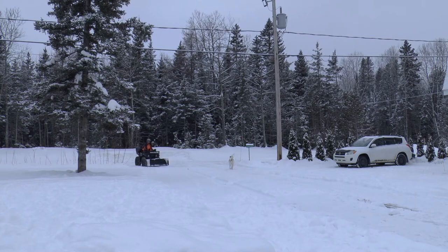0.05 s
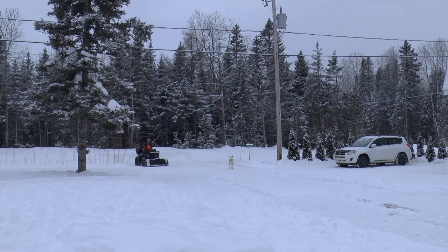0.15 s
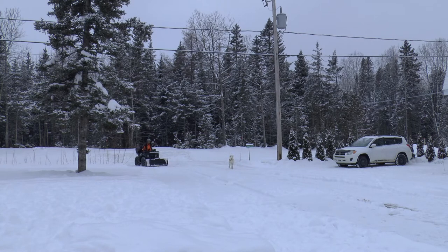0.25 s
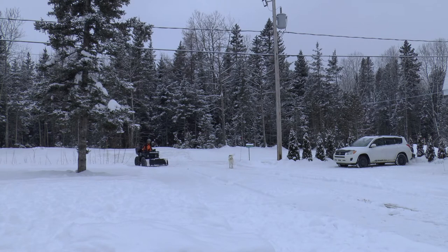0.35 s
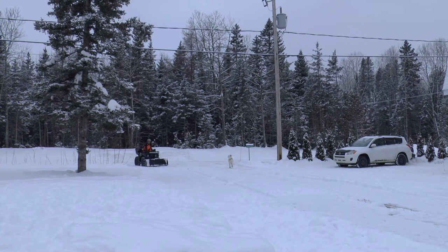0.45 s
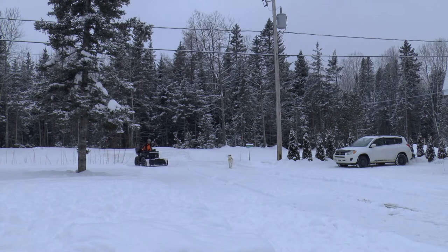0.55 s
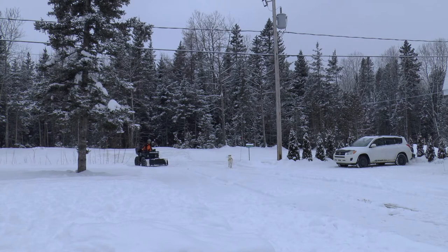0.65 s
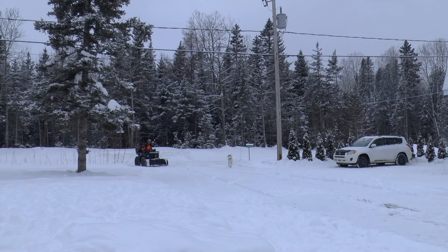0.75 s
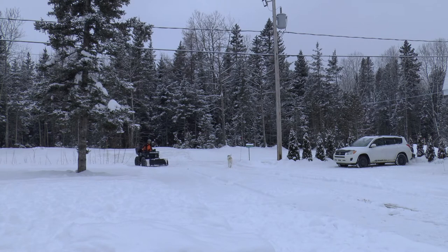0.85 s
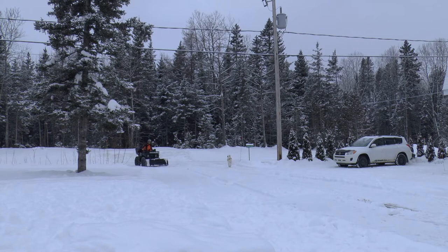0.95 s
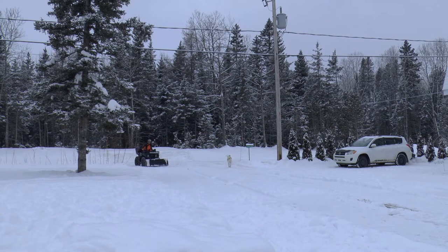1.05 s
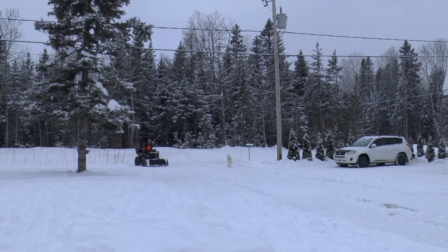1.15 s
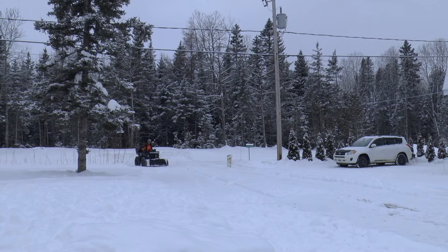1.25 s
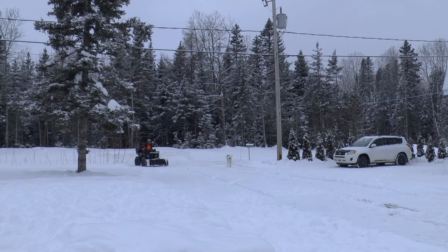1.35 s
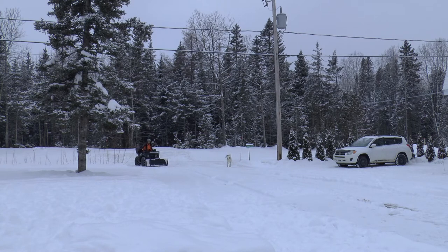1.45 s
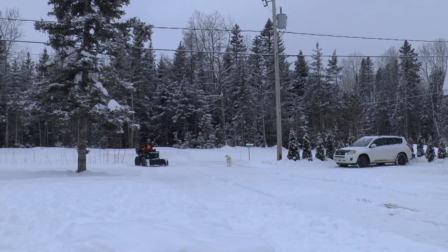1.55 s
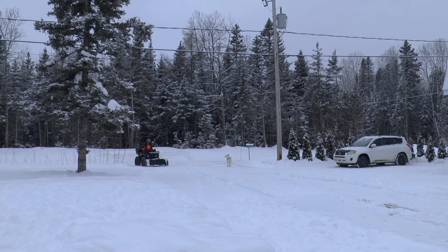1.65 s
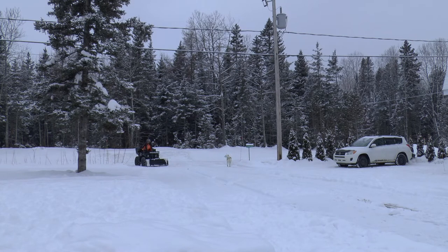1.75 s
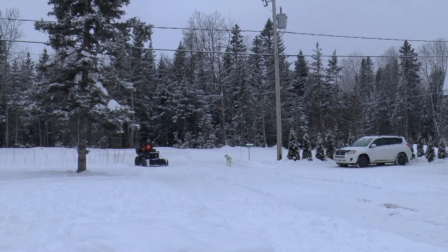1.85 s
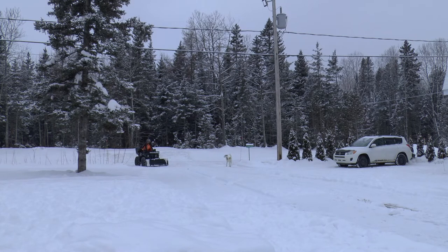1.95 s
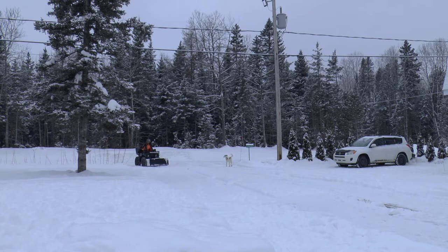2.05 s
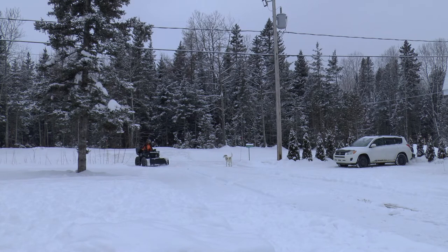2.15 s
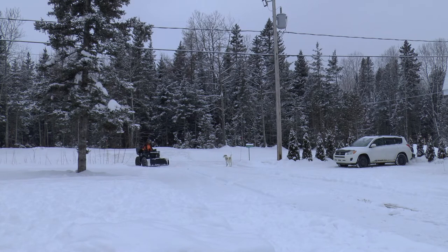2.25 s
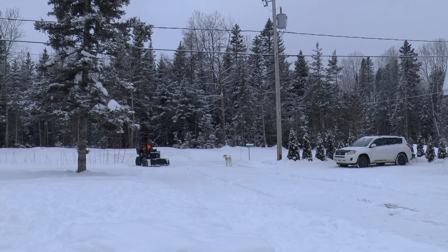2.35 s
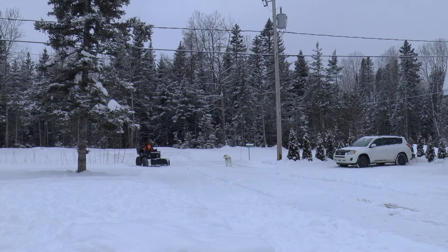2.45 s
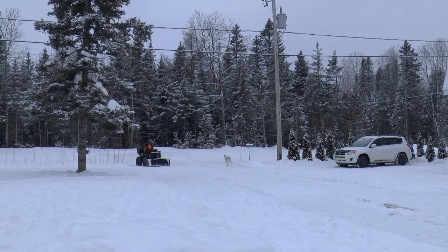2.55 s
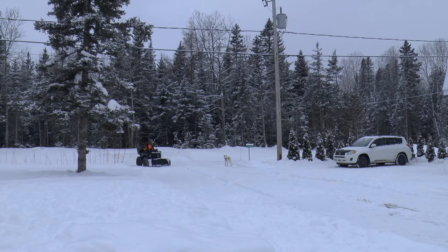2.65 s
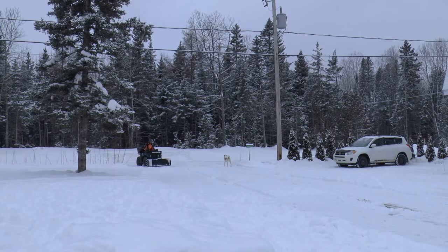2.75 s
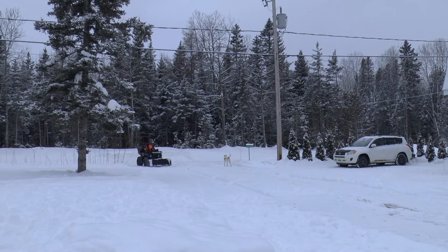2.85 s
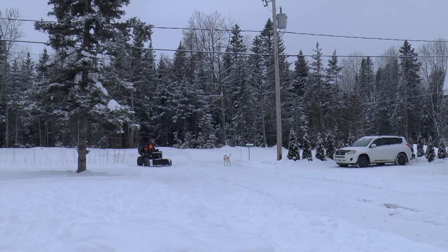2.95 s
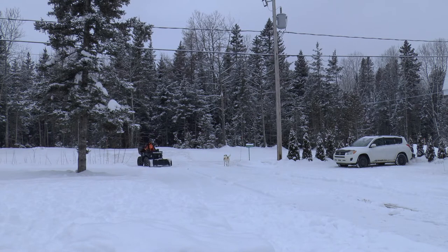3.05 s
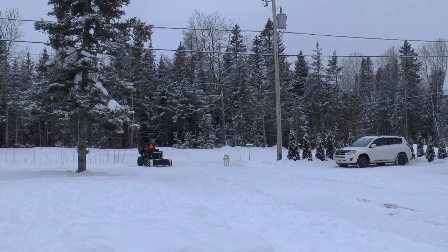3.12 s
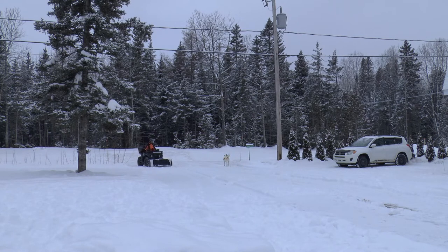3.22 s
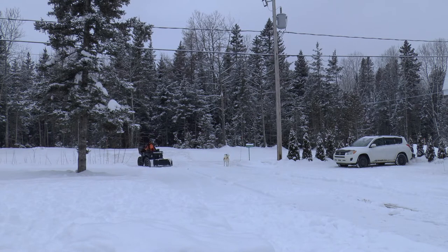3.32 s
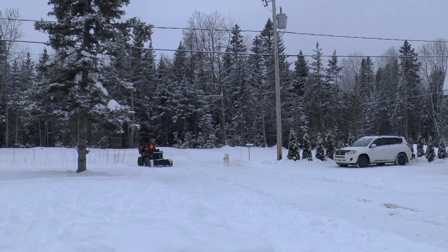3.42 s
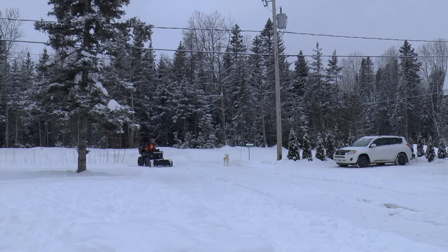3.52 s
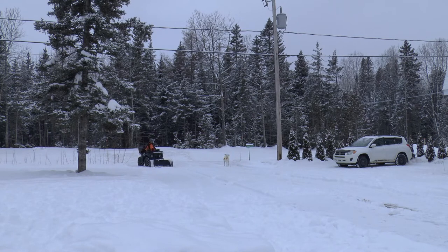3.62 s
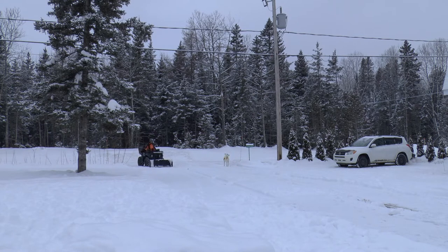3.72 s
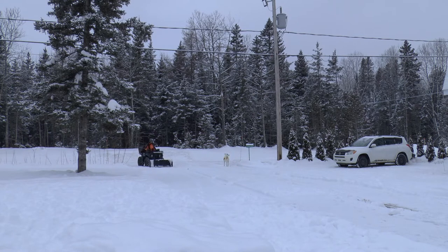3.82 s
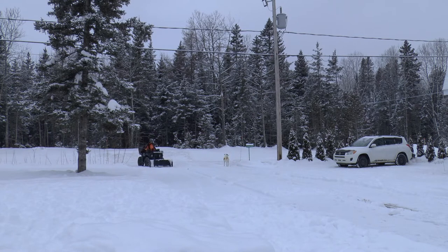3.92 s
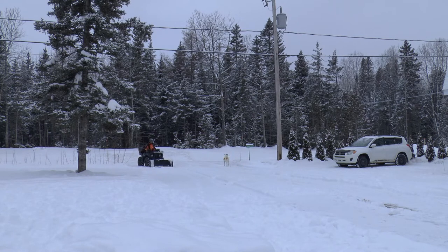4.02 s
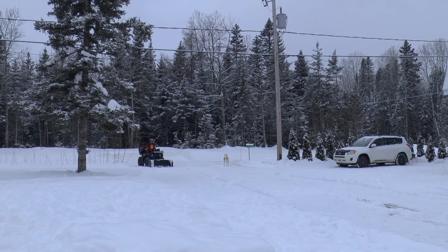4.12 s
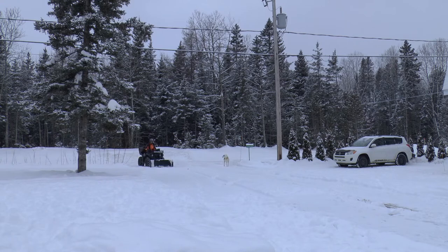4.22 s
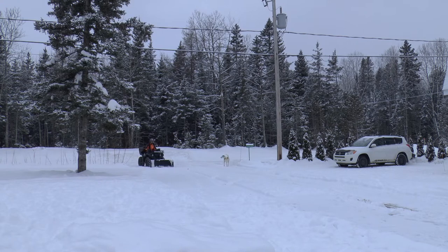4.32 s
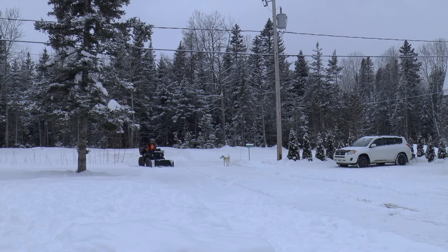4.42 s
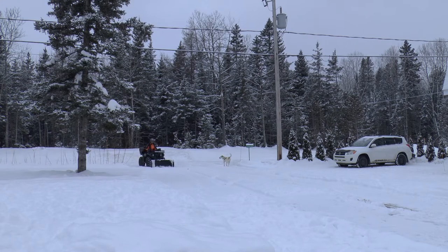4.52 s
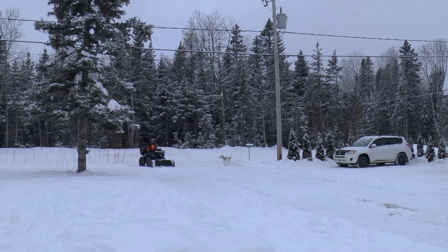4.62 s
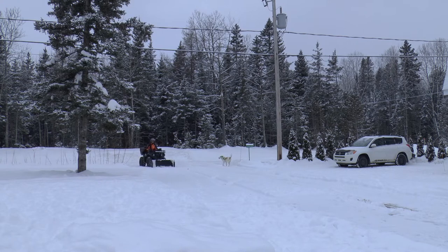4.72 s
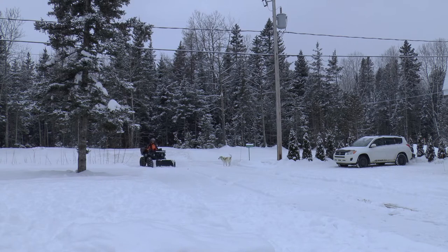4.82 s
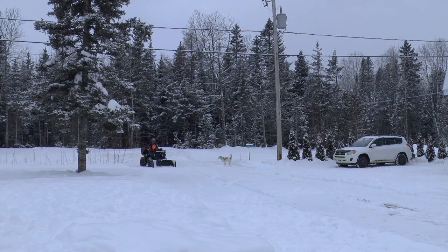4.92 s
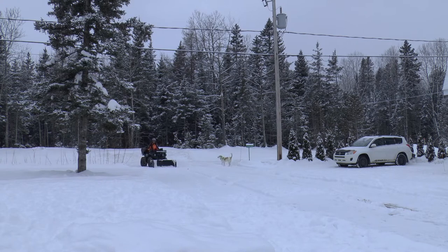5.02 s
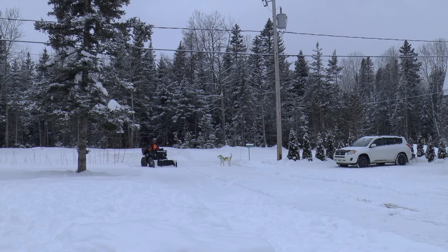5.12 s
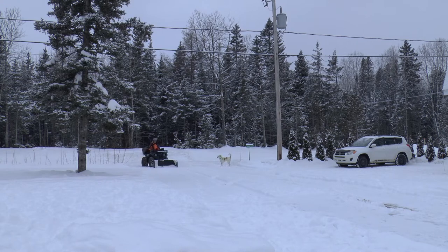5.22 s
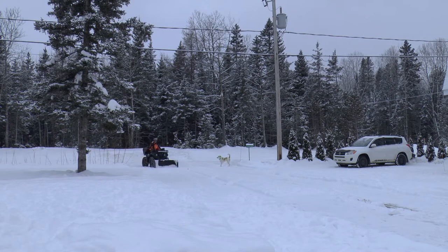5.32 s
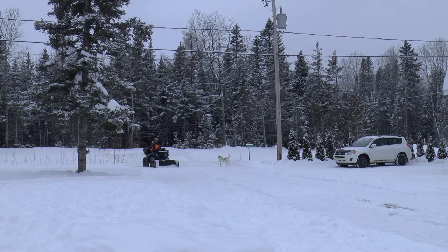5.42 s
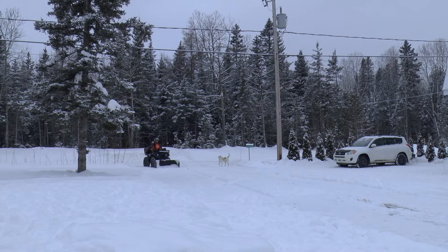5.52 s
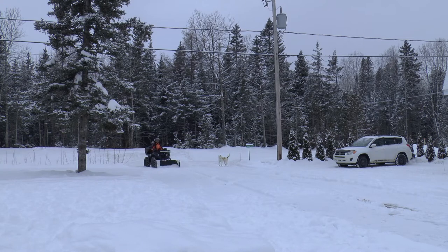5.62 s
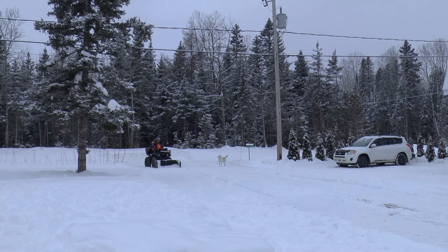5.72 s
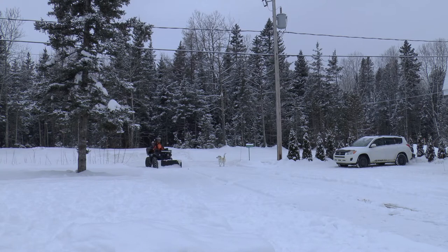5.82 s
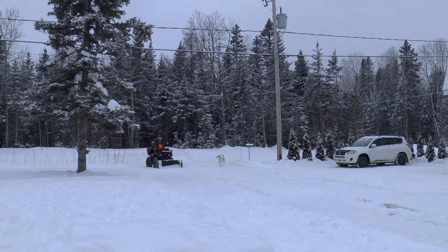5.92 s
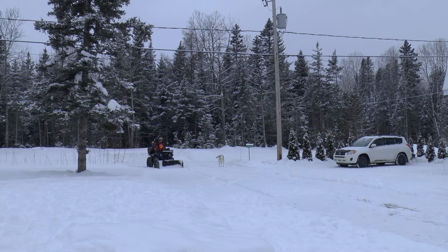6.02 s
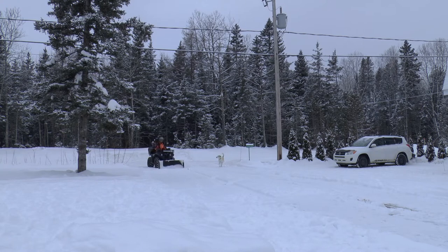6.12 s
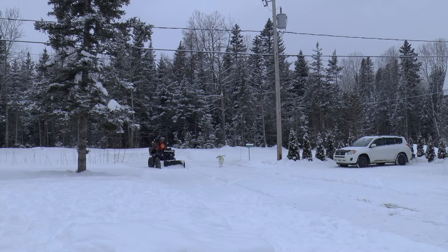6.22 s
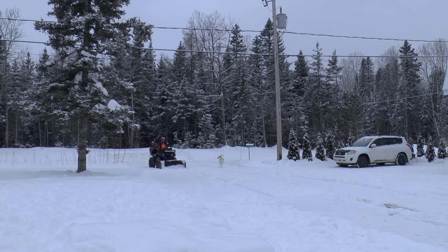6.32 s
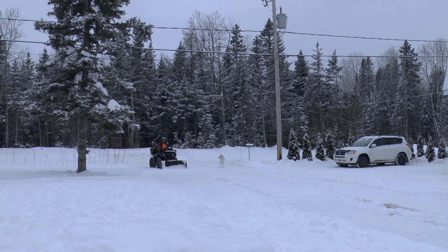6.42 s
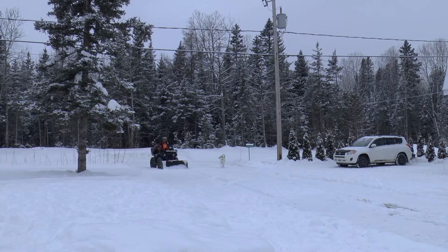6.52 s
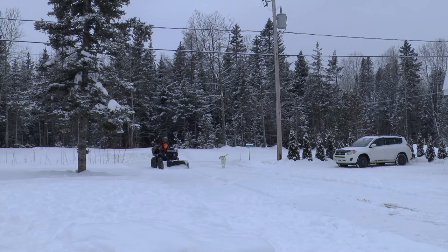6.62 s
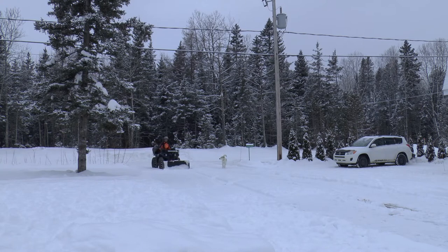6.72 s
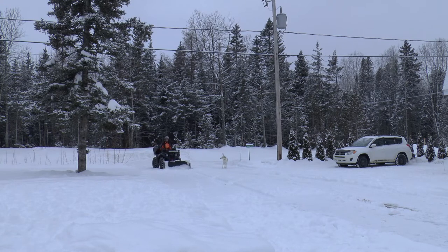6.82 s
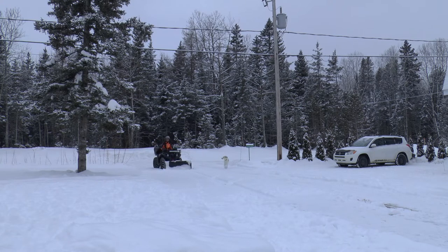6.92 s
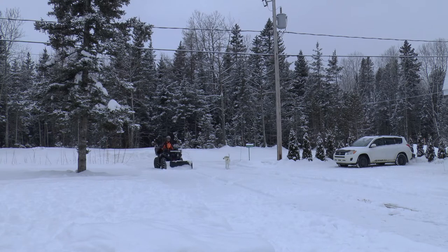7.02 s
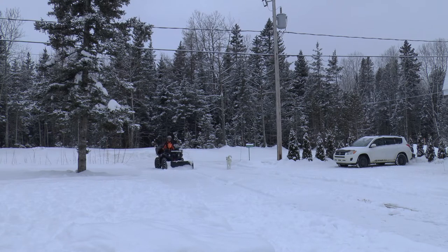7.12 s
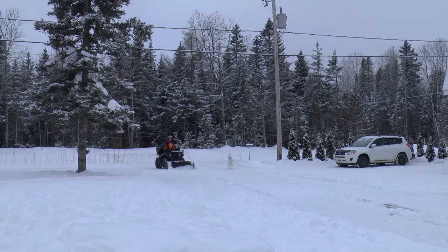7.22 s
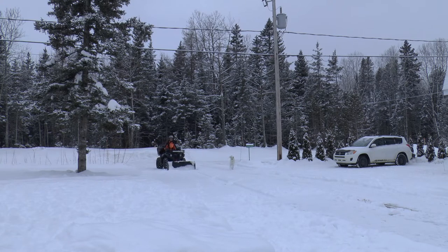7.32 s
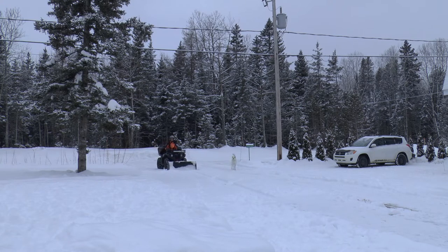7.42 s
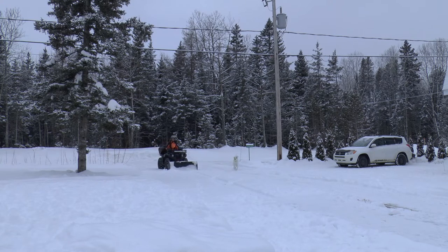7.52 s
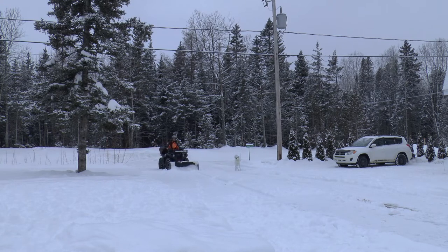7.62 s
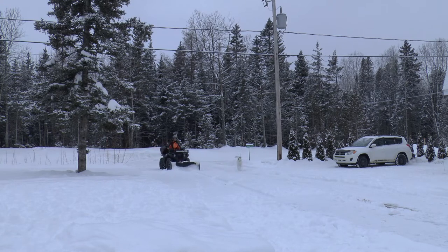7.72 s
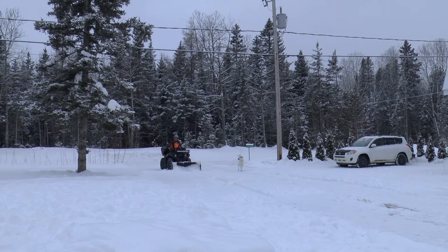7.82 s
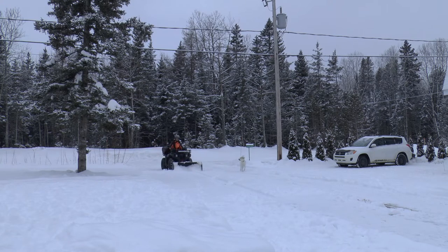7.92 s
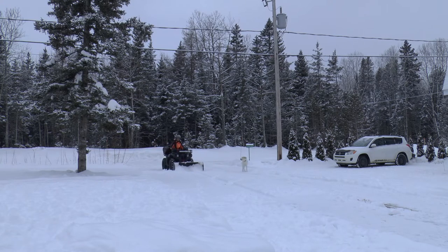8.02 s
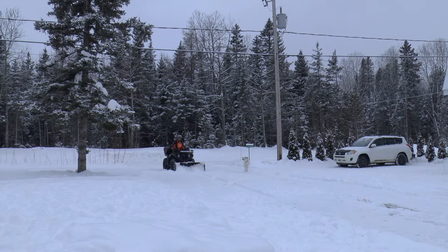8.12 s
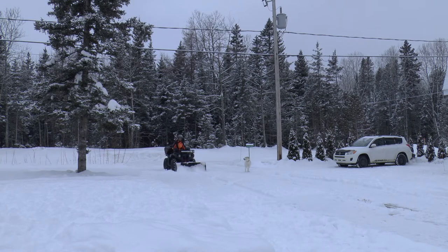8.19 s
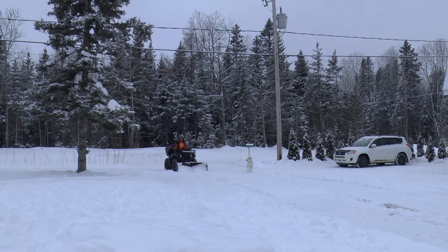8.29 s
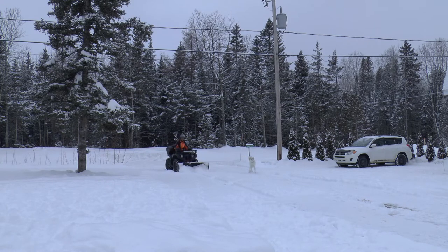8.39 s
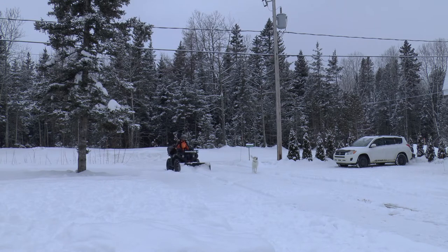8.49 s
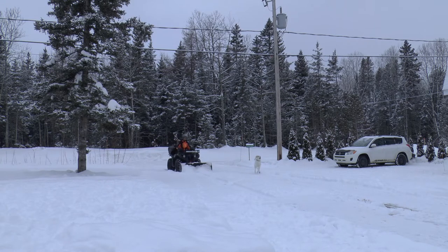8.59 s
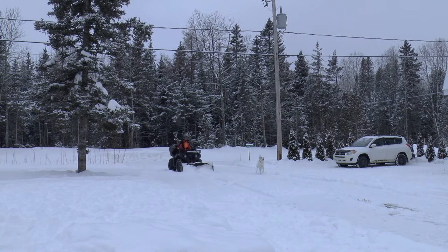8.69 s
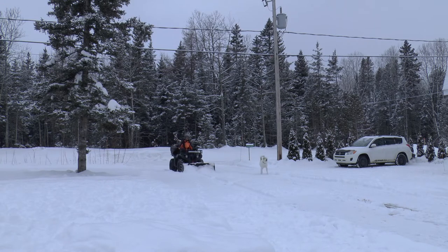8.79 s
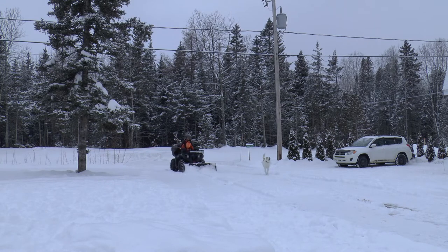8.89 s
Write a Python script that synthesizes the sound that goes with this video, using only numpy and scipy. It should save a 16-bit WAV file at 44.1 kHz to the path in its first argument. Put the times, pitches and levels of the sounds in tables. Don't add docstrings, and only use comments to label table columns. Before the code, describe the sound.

Across an open snowy yard, a quad's single-cylinder engine idles in slow uneven thuds while loose plow steel clinks. It revs briefly, drops back with a soft muffler pop and clanks, then revs again as an electric winch hisses and knocks. The winch stops and the engine pulls harder, growing louder toward the end. The microphone stays still at a distance, with only short dull echoes from the trees.

```python
import sys
import numpy as np
from scipy import signal
from scipy.fft import rfft, irfft, next_fast_len
from scipy.io import wavfile
from scipy.ndimage import uniform_filter1d

SR = 44100
rng = np.random.default_rng(int(sys.argv[2]) if len(sys.argv) > 2 else 0)


def log_audio(samples):
    frames = np.atleast_2d(samples).T
    limited = np.clip(frames, -1, 1)
    pcm = np.round(limited * 32767).astype(np.int16)
    wavfile.write(sys.argv[1], SR, pcm)


def volts_from_decibels(level):
    exponent = np.asarray(level, float) / 20
    return 10 ** exponent


N = 394694
T = np.arange(N) / SR
TURNING_S = 6.15, 7.42


def evened(x):
    return x / np.sqrt(np.mean(x ** 2) + 1e-20)


def curves(rows):
    s, *columns = np.transpose(rows)
    return [np.interp(T, s, column) for column in columns]


def colour(x, points):
    size = next_fast_len(len(x))
    hz, db = np.transpose(points)
    shape_db = np.interp(np.log(np.fft.rfftfreq(size, 1 / SR) + 1), np.log(hz), db)
    return irfft(rfft(x, size) * volts_from_decibels(shape_db), size)[:len(x)]


def resonate(x, hz, width):
    r = np.exp(-np.pi * width / SR)
    return 2 * signal.lfilter([1 - r], [1, -r * np.exp(2j * np.pi * hz / SR)], x).real


def rings(x, modes, widen):
    return sum(volts_from_decibels(db) * resonate(x, hz, widen * width) for hz, width, db in modes)


def wander(per_s):
    count = int(N / SR * 200) + 2
    slow = uniform_filter1d(rng.standard_normal(count), max(int(200 / per_s), 1))
    return evened(np.interp(T, np.linspace(0, T[-1], count), slow))


def burst(turns, place, width):
    return np.exp(-((turns - place) % 1) / width)


def exhaust(turns, rate, load, level_db):
    # (frequency [Hz], level [dB])
    muffler_cool = [(47, -7.5), (59, -18), (80, -3), (107, -3), (119, -17), (140, -18), (170, -25),
                    (230, -40)]
    # (frequency [Hz], level [dB])
    muffler_away = [(44, -9.5), (62, -31), (84, -11), (111, 0), (123, -2), (144, -26), (164, -18),
                    (200, -40)]
    # (frequency [Hz], level [dB])
    muffler_round = [(50, -13), (60, -24), (84, -4), (99, -14), (114, 0), (126, -2), (148, -20), (200, -40)]
    # (frequency [Hz], bandwidth [Hz], level side-on [dB], level facing [dB])
    pipe_modes = [(173, 55, -24, -28.5), (246.6, 25, -27, -41.5), (452, 39, -57, -45),
                  (580, 16, -34.5, -30), (743, 54, -29, -50), (1075, 36, -49, -46)]
    stride = 16
    outlet_hz = 40
    uneven = 1 - .7 * load
    slow_rate = rate[::stride]
    hot = np.interp(slow_rate, (15, 19), [0, 1])
    swung = np.interp(T[::stride], (5.2, 5.8), [0, 1])
    shares = 1 - hot, hot * (1 - swung), hot * swung
    sweep = np.dot([-1.6, 1, 4], shares)

    thud = 0
    for order in range(1, 13):
        hz = order * slow_rate
        passed_db = 0
        for share, muffler in zip(shares, (muffler_cool, muffler_away, muffler_round)):
            muffler_hz, muffler_db = np.transpose(muffler)
            passed_db = passed_db + share * np.interp(np.log(hz), np.log(muffler_hz), muffler_db)
        radiated = volts_from_decibels(passed_db) / (1 + (outlet_hz / hz) ** 4)
        phase = np.exp(1j * sweep * ((hz - 100) / 60) ** 2)
        wobble = volts_from_decibels(1.8 * uneven * wander(12)) * np.exp(.25j * uneven * wander(8))
        carrier = np.exp(2j * np.pi * order * turns[::stride])
        thud = thud - (radiated * phase * wobble[::stride] * carrier).real
    thud = signal.resample_poly(thud, stride, 1)[:N]

    rumble = evened(resonate(resonate(rng.standard_normal(N), 105, 60), 105, 60))
    fired = np.diff(np.floor(turns), prepend=np.floor(turns[0])) > 0
    kicks = fired * volts_from_decibels(2.0 * wander(15))
    pipe = 0
    for hz, width, side_db, facing_db in pipe_modes:
        mode = evened(resonate(resonate(kicks, hz, width), hz, width))
        pipe = pipe + volts_from_decibels(np.interp(T, TURNING_S, [side_db, facing_db])) * mode
    return volts_from_decibels(level_db) * (np.sqrt(2) * thud + pipe + volts_from_decibels(-13) * uneven * rumble)


def pop():
    since = T - 3.04
    return volts_from_decibels(-39 - 4.3 * (since / .022) ** 2) * np.cos(2 * np.pi * 117 * since)


def clatter(turns, rate, load, level_db):
    # (frequency [Hz], level [dB per Hz])
    casing_facing = [(100, -23), (170, -8.5), (514, -10.5), (575, -7), (631, -13), (762, -2.5),
                     (885, -14.5), (1410, -7.5), (1550, -7), (2390, -2.5), (3750, -11), (5770, -25.5),
                     (15000, -39.5)]
    casing_side = [(100, -19), (170, -2), (477, -13), (762, -10), (868, -14.5), (1090, -14), (1260, -14.5),
                   (1410, -9), (2020, -2.5), (3820, -16), (4600, -13.5), (5880, -26.5), (15000, -37)]
    casing_idle = [(100, -15), (170, 6), (238, -6.5), (304, -0.5), (340, -8), (707, -7.5), (954, -14.5),
                   (1190, -11), (1550, -9.5), (1840, 0), (3960, -11), (6450, -26), (12000, -28.5),
                   (15000, -34)]
    # (frequency [Hz], level [dB per Hz])
    valve_spectrum = [(900, -87), (1700, 5.5), (2400, 10.5), (3600, 5.5), (5000, -15), (9000, -25),
                      (14000, -47)]
    # (frequency [Hz], bandwidth [Hz], level [dB])
    panels = [(1100, 114, -13.5), (1422, 27, -1.5), (2392, 15, -1), (2700, 26, -1), (3020, 45, -5.5),
              (3780, 510, -20.5)]
    cycle = np.floor(turns + 1).astype(int)
    tick = volts_from_decibels(.7 * rng.standard_normal((400, 2)))[cycle].T
    ticks = tick[0] * burst(turns, .1, .08) + .5 * tick[1] * burst(turns, .6, .1)
    breathing = .3 * (1 - load) * np.cos(2 * np.pi * (turns - .75))
    pulsing = 0.077 * load * np.cos(2 * np.pi * (turns - .1))
    rush = (1 + breathing + pulsing) * volts_from_decibels(0.63 * wander(23)) * rng.standard_normal(N)
    since = (2 * (turns - .1) % 1 / (2 * rate) * SR).astype(int)
    seat = rng.standard_normal(SR)[since]
    valves = ticks * (seat + 1.1 * rng.standard_normal(N))

    facing = np.interp(T, TURNING_S, [0, 1])
    pulling = (1 - facing) * evened(colour(rush, casing_side)) + facing * evened(colour(rush, casing_facing))
    body = (1 - load) * evened(colour(rush, casing_idle)) + load * pulling
    covers = volts_from_decibels(-12.0 + 1.95 * facing) * evened(rings(rush + 0.71 * valves, panels, widen=0.75))
    sharp_db = -7.5 + 4.5 * facing + .25 * (rate - 29)
    impacts = volts_from_decibels(sharp_db) * evened(colour(valves, valve_spectrum))
    return volts_from_decibels(level_db) * evened(body + covers + impacts)


def winch():
    # (frequency [Hz], level [dB per Hz])
    winch_body = [(710, -48), (1200, -12), (1420, -36), (1580, -14), (1830, 2), (2650, -10), (2880, 8.5),
                  (3140, -0.5), (4790, 0), (5610, -12.5), (15000, -42)]
    # (frequency [Hz], bandwidth [Hz], level [dB])
    winch_rings = [(1400, 15, 0.5), (1820, 51, -35), (2150, 64, 0), (2520, 67, 1.5), (2630, 57, -21.5),
                   (3400, 75, 1), (3830, 41, 2), (5370, 110, -12), (5960, 200, -13.5), (6440, 35, -11)]
    # (time [s], level [dB])
    snags = [
        (3.627, 11),
        (3.655, 7),
        (3.985, 9),
        (4.643, 9),
        (5.277, 16),
    ]
    start, stop = 3.347, 5.44
    level_db = -41.5 - 8 * np.exp(-np.maximum(T - start, 0) / .33)
    turns = np.cumsum(73 * (1 + 0.025 * wander(3))) / SR
    knock = volts_from_decibels(2.2 * rng.standard_normal(800))[turns.astype(int)]
    drive = (1 + 1.1 * knock * burst(turns, 0, .35)) * volts_from_decibels(1.1 * wander(9)) * rng.standard_normal(N)
    jumps_db = sum(db * np.exp(-((T - s) / 0.0062) ** 2) for s, db in snags)
    drum = resonate(drive * volts_from_decibels(6.1 * wander(40) + jumps_db), 2881, 77)
    housing = evened(rings(drive, winch_rings, widen=.9))
    sound = evened(colour(drive, winch_body)) + 0.48 * housing + 0.25 * evened(drum)
    running = np.clip(np.minimum((T - start) / 0.05, (stop - T) / .05), 0, 1)
    return volts_from_decibels(level_db) * running * evened(sound)


def rattles():
    # (time [s], peak level [dB], decay time T60 [s])
    loose_jolts = [(0.0044, -45.5, 0.091), (0.0998, -34, 0.098), (0.1128, -39, 0.31), (0.167, -35.5, 0.06),
                   (0.191, -34, 0.12), (0.504, -35.5, 0.097), (0.5602, -44, 0.06), (0.872, -45, 0.065),
                   (0.997, -31.5, 0.22), (1.083, -39, 0.18), (1.099, -31.5, 0.11), (1.801, -50, 0.063),
                   (2.0036, -34, 0.11), (2.4073, -33, 0.19), (2.433, -35, 0.059), (2.512, -38, 0.1),
                   (2.7658, -33.5, 0.074), (2.95, -31.5, 0.17), (2.9679, -31, 0.071), (3.159, -31.5, 0.096),
                   (3.1923, -26, 0.17), (3.216, -36, 0.085), (3.5251, -31.5, 0.045)]
    # (time [s], peak level [dB], treble level [dB])
    knocks = [
        (1.988, -33.5, -6),
        (2.9349, -31.5, -17),
        (3.015, -36, -4),
        (3.038, -30.5, -14),
        (3.3695, -25, 7),
        (3.375, -27, 5),
        (3.397, -41, -1),
        (5.388, -32.5, -6),
    ]
    # (frequency [Hz], bandwidth [Hz], level [dB])
    steel = [(2020, 27, -33), (2540, 57, -8.5), (2860, 150, -6), (3130, 24, 0.5), (3507, 40, -2),
             (3714, 71, 0), (4050, 62, -2.5), (4420, 28, -6)]
    out, t = np.zeros(N), np.arange(6000) / SR
    jolts = [(s, db, -33, t60) for s, db, t60 in loose_jolts]
    jolts += [(s, db, treble_db, 0.077) for s, db, treble_db in knocks]
    for s, db, treble_db, t60 in jolts:
        strikes = rng.standard_normal(len(t)) * volts_from_decibels(3.5 * np.repeat(rng.standard_normal(60), 100))
        chatter = strikes * np.minimum(t / .0015, 1) * volts_from_decibels(-60 * t / t60)
        clank = evened(resonate(chatter, 2850, 1200)) + 3.0 * evened(rings(chatter, steel, widen=1.36))
        clank += volts_from_decibels(treble_db + 21.0) * evened(resonate(chatter, 6400, 4100))
        clank = colour(clank, [(500, -4), (1400, 0.5), (2000, 10.5), (12000, -8.5), (16000, -6)])
        part = out[round(s * SR):][:len(t)]
        part += volts_from_decibels(db) * clank[:len(part)] / abs(clank).max()
    return out


def snaps():
    # (time [s], peak level [dB])
    crystals = [
        (0.72, -50),
        (3.5, -55),
        (3.92, -59),
    ]
    out, t = np.zeros(N), np.arange(600) / SR
    for s, db in crystals:
        tick = resonate(rng.standard_normal(len(t)) * volts_from_decibels(-60 * t / .012), 12000, 3500)
        out[round(s * SR):][:len(t)] += volts_from_decibels(db) * tick / abs(tick).max()
    return out


def yard(x):
    taps = rng.choice([-1., 1.], (2, 12000)) * (rng.random((2, 12000)) < .05)
    taps *= volts_from_decibels(-60 * np.arange(12000) / SR / 0.063)
    taps[:, :300] = 0
    thin = colour(x, [(150, -21), (300, -3)])
    thin = colour(thin, [(600, 9), (1200, 3.5), (3000, 2), (5000, -3), (9000, -7)])
    return signal.fftconvolve(thin[None], taps / np.linalg.norm(taps[0]), axes=1)[:, :N]


def air():
    # (frequency [Hz], level [dB per Hz])
    air_spectrum = [(20, 11), (40, 33), (150, 23), (400, 25), (1000, -18), (5000, -19), (10000, 5),
                    (15700, 8.5)]
    # (frequency [Hz], likeness [0 to 1])
    likeness = [(100, 0.88), (1000, 0.22), (5000, 0.26), (12000, 0.047)]
    size = next_fast_len(N)
    hz, same = np.transpose(likeness)
    same = np.clip(np.interp(np.log(np.fft.rfftfreq(size, 1 / SR) + 1), np.log(hz), same), 0, 1)
    left, other = rfft(rng.standard_normal((2, size)))
    right = same * left + np.sqrt(1 - same ** 2) * other
    sides = [colour(irfft(z, size)[:N], air_spectrum) for z in (left, right)]
    return volts_from_decibels(-67.5) * evened(np.array(sides))


def scene():
    # (time [s], firing rate [1/s])
    speed = [(0.0, 11.98), (1.45, 11.65), (1.63, 16.35), (1.83, 19.77), (2.08, 20.63), (2.78, 19.2),
             (2.87, 15.8), (3.27, 11.5), (3.61, 11.46), (3.78, 17.49), (4.02, 20.66), (4.55, 22.3),
             (5.46, 22.55), (6.14, 26.66), (6.67, 27.9), (7.64, 29.98), (7.84, 29.84), (8.95, 28.51)]
    # (time [s], level above the first idle [dB])
    effort = [(0.0, -0.7), (1.45, -1), (1.68, 4), (2.1, 0.5), (2.74, 1), (2.9, 0.8), (3.02, 5), (3.15, 2.7),
              (3.6, 1.1), (3.78, 5.5), (4.1, 4), (4.7, 6), (5.6, 8), (6.0, 6), (6.4, 7), (7.2, 8),
              (8.2, 10), (8.95, 10)]
    # (frequency [Hz], level [dB])
    distance = [(7000, 0), (10500, 0), (12500, -9), (15500, -12)]
    idle_rate, loaded_rate = 13.4, 15.2
    rate, = curves(speed)
    turns = np.cumsum(rate) / SR - .2
    load = np.clip((rate - idle_rate) / (loaded_rate - idle_rate), 0, 1)
    effort_db, = curves(effort)
    extra_rate = rate - rate[0]
    exhaust_db = -49.5 + 0.35 * extra_rate + effort_db
    clatter_db = -57 + 0.6257 * extra_rate + 0.44 * effort_db
    engine = exhaust(turns, rate, load, exhaust_db) + clatter(turns, rate, load, clatter_db)
    quad = colour(engine + pop() + winch() + rattles(), distance)
    direct = quad * volts_from_decibels([[.15], [-.15]])
    return direct + volts_from_decibels(-13.5) * yard(quad) + air() + snaps()


def band_limit(x):
    return signal.sosfilt(signal.butter(12, 15730, fs=SR, output="sos"), x)


def record(dry):
    return band_limit(dry)


dry = scene()
out = record(dry)
log_audio(out)
```